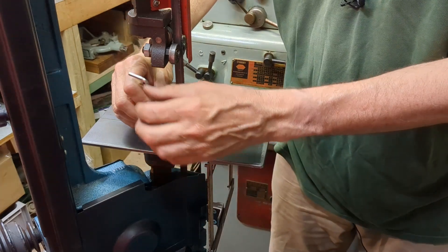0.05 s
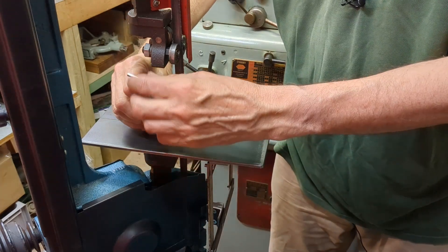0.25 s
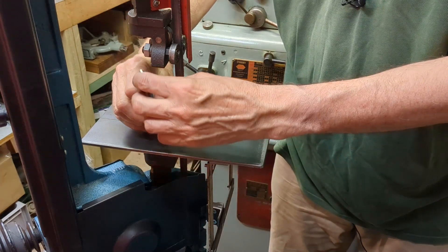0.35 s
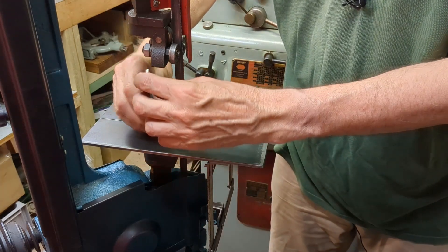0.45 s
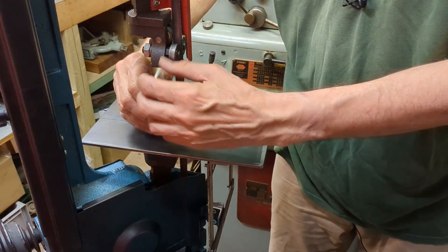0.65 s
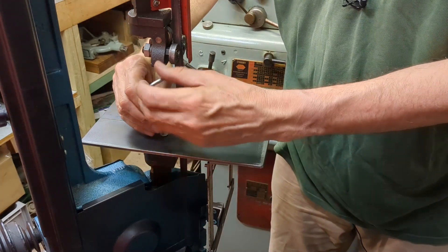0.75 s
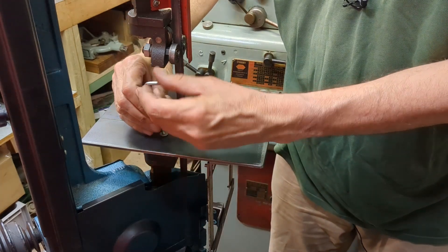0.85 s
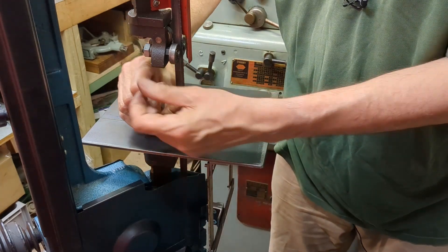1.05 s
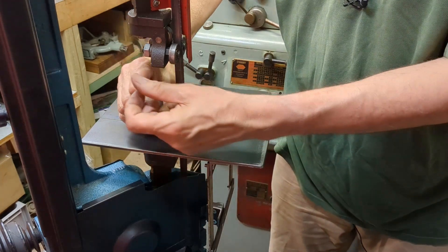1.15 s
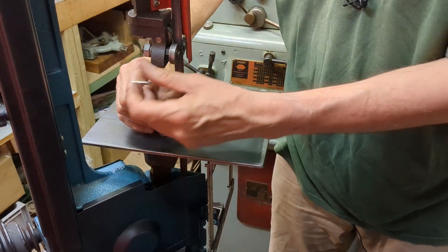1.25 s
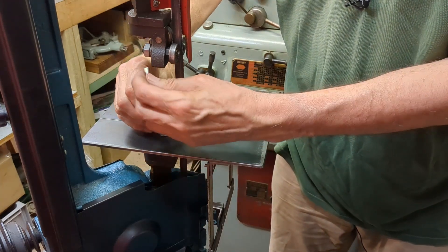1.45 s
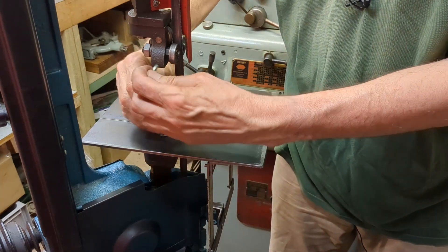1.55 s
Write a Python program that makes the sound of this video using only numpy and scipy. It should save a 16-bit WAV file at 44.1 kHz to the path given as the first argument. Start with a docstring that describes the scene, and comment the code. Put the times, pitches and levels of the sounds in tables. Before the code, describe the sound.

A thin steel rod clinks in a steel plate, close in a small workshop with short echo. Muted ticks and a brief scrape come around 0.2 s, with dull low knocks until 0.35 s. A deep rumble swells near 0.45 s and fades by 1 s; light ticks fall around 0.85 s. Two hard, bright clattering clinks hit at 1.23 and 1.27 s, then faint scrapes and ticks to 1.6 s.

```python
"""A thin steel rod is worked into a hole in the steel table of a machine, in a small workshop room.
Decaying sines make the two hard clinks of rod and plate; shaped noise adds the clatter of other parts.
Lighter ticks mix noise and muted ringing; the scrape along the rim is a run of random slips.
Dull low swings knock in the plate, and noise rumbles in the stand, swelling and sinking.
The rod reaches the microphone mostly direct, the rest with more of the room, over a faint hiss.
"""
import sys
import numpy as np
from scipy import signal
from scipy.fft import rfft, irfft
from scipy.io import wavfile

SR = 44100
rng = np.random.default_rng(int(sys.argv[2]) if len(sys.argv) > 2 else 0)


def put_to_file(sound):
    """Save the sound as 16-bit audio at rate SR, in the file named by the first command-line argument."""
    columns = np.atleast_2d(sound).T  # one column per channel
    safe = np.clip(columns, -1, 1)
    whole_steps = np.round(safe * 32767)
    wavfile.write(sys.argv[1], SR, whole_steps.astype(np.int16))


N = 70560  # samples, 1.6 s

# hard strikes of the rod: start_s, level_db, low_edge_hz, brightness_hz, rod_ring_db, plate_ring_db, clatter_db
CLINKS = [(1.2334, 1, 494, 6000, -5.5, 1.5, -2.5), (1.2691, 0.5, 190, 12170, 3.5, -9, 4)]
# ringing modes of the rod: pitch_hz, level_db, t60_s
ROD_MODES = [(1962, -34, .17), (1982, -42, .62), (2929, -32, .16), (4780, -40, .1), (5803, -33, .12),
             (3961, -34, .13), (4653, -44, .2), (6915, -56, .21)]
# ringing modes of the plate: pitch_hz, level_db, t60_s
PLATE_MODES = [(534, -38, .13), (581, -53.5, 0.38), (705, -47, .14), (783.5, -37.5, .14),
               (828.4, -25, 0.063), (890.2, -27, 0.11), (1118.6, -36.5, .08), (1140, -23.5, 0.055),
               (1302, -37, .12), (1510.6, -37, 0.12), (2377, -26.5, 0.037), (2576, -34, 0.077),
               (2616, -29.5, 0.09), (3690, -43, 0.055)]
# low modes of the machine's frame: pitch_hz, level_db, t60_s
FRAME_MODES = [(172, -57, .2), (238, -48, .22), (296, -48, .25), (352, -49, .3), (424, -51, .4)]
FRAME_RISE_S = 0.023
# colour of the dense clatter of the machine's other parts: frequency_hz, relative_level_db
CLATTER_COLOUR = [(100, -27.5), (250, -15.5), (420, -7.5), (560, -8.5), (850, 1), (1200, -2.5),
                  (1700, -6.5), (2500, -7.5), (3200, -9.5), (3800, -8), (4600, -11.5), (5150, -18),
                  (5750, -9.5), (6500, -26), (7300, -39)]
CLATTER_DB, CLATTER_HOLD_S, CLATTER_T60_S = -29.5, 0.008, 0.07
CONTACT_S = 0.00042  # time constant of the rise of a contact, about

# light catches of the rod on the rim: start_s, level_db, brightness_hz, rod_ring_db
TICKS = [(.083, -26.5, 1456, -3.5), (.1975, -15.5, 1100, 2.5), (0.208, -14, 1816, -1),
         (0.84, -21, 4200, -7), (.8836, -10.5, 3930, -0.5), (1.165, -29, 1340, 10.5),
         (1.403, -24, 2000, -3), (1.5262, -15.5, 2213, 7), (1.591, -17.5, 2780, -1)]
# colour of a light catch: frequency_hz, relative_level_db
TICK_COLOUR = [(200, -40.5), (450, -27.5), (600, -12), (840, 8.5), (1020, -11), (1200, 4.5), (1600, -11.5),
               (1850, -28.5), (2300, -30), (2650, -15), (3100, -60.5), (3650, -14), (3980, -11),
               (4400, -48), (7000, -46.5)]
TICK_DB, TICK_HOLD_S, TICK_T60_S, TICK_PLATE_DB = -32, 0.0088, 0.067, -5.5
TICK_MUTING = 0.57  # share of the tick's colour, in dB, that the ringing modes take on

# strokes of the rod along the rim: start_s, end_s, start_level_db, end_level_db, low_edge_hz, brightness_hz
STROKES = [(0, 0.17, -62.5, -60, 350, 2200), (.2, 0.345, -42.5, -76.5, 300, 1110),
           (0.505, 0.547, -72, -64.5, 650, 900), (.58, 0.637, -68.5, -75.5, 750, 938),
           (0.802, 0.843, -71.5, -52.5, 1100, 1720), (0.905, 1.012, -58, -84, 650, 1750),
           (1.042, 1.266, -73, -53.5, 600, 1770), (1.31, 1.468, -48, -68, 350, 1800),
           (1.541, 1.616, -55, -59.5, 450, 1750)]
# colour of the scrape: frequency_hz, relative_level_db
SCRAPE_COLOUR = [(200, -34), (420, -18), (560, -4), (720, -3.5), (860, 3), (1030, -19), (1250, -5),
                 (1480, -11.5), (1700, -37.5), (2400, -30.5), (7000, -57)]
SLIPS_PER_S, SLIP_SCATTER_DB, SCRAPE_RING_DB = 690, 4.5, -13
STROKE_ATTACK_S, STROKE_T60_S = 0.012, 0.084

# dull knocks of the shifting plate: start_s, pitch_hz, level_db, swell_s
KNOCKS = [(0.196, 35.9, -28.5, 0.011), (0.2172, 82.7, -16.5, 0.0058), (.250, 102, -18.5, 0.0037),
          (.277, 35.6, -24.5, 0.0063), (0.326, 66.3, -21.5, 0.006), (0.351, 64.5, -41, 0.0083),
          (0.605, 37.84, -34, .009), (0.721, 68.9, -45.5, 0.0054)]
KNOCK_OVERTONE, KNOCK_OVERTONE_DB = 2.06, -14.5  # pitch ratio, level
FRAME_KNOCK_DB = -0.5

# rumble of the stand over time: time_s, level_db
RUMBLE_LEVEL = [(0, -72), (.16, -59), (.23, -53), (.36, -48.5), (.45, -44.5), (.65, -46.5), (.87, -51),
                (1.0, -63), (1.15, -68.5), (1.6, -67.5)]
# colour of the rumble: frequency_hz, relative_level_db
RUMBLE_COLOUR = [(12, -3), (28, 6.5), (50, -7.5), (80, -16.5), (120, -31), (200, -43.5), (400, -65),
                 (900, -84)]

# decay of the room's echo: frequency_hz, t60_s
ROOM_T60 = [(150, 0.52), (400, 0.07), (1000, 0.3841), (2000, 0.33), (4000, 0.0326), (7000, 0.27)]
# colour of the room's echo: frequency_hz, relative_level_db
ROOM_COLOUR = [(60, -19.5), (170, -12.5), (330, 8), (600, 2), (900, -8), (2000, -3.5), (4000, 3),
               (7000, -7.5)]
ROOM_DB, ROOM_ONSET_S, ROD_ROOM_DB = -6.5, 0.008, -6.5

# colour of the recorder's hiss: frequency_hz, relative_level_db
HISS_COLOUR = [(20, 6.5), (80, 7.5), (180, 14.5), (300, -9.5), (1000, -11.5), (3000, -11.5), (8000, -18),
               (15000, -20.5)]
HISS_DB, TOP_HZ = -86.5, 7050


def undb(db):
    """Decibels to gain."""
    return 10 ** (np.asarray(db) / 20)


def unit(x):
    """Scale to an rms of 1."""
    return x / np.sqrt(np.mean(x ** 2) + 1e-30)


def curve(points):
    """Join (s, value) points by straight lines."""
    return np.interp(np.arange(N) / SR, *np.array(points).T)


def at(points, hz):
    """Read (Hz, value) points on a log-frequency axis."""
    point_hz, values = np.array(points, float).T
    return np.interp(np.log(hz + 1e-9), np.log(point_hz), values)


def freqs():
    """Frequencies of the padded spectrum, in Hz."""
    return np.arange(N + 1) * SR / (2 * N)


def shape(x, gain):
    """Filter by a gain per frequency."""
    return irfft(rfft(x, 2 * N) * gain)[:N]


def noise(colour):
    """Noise of a given colour, rms 1."""
    gain = undb(at(colour, freqs()))
    return unit(shape(rng.standard_normal(N), gain))


def age(start):
    """Seconds since a moment, zero before it."""
    return np.maximum(np.arange(N) / SR - start, 0)


def fade(t, t60):
    """Exponential decay, 60 dB in t60 seconds."""
    return np.exp(-np.log(1000) * t / t60)


def soften(x, hz, order=3, kind="low"):
    """A softer contact leaves out the treble (or, as a high-pass, a lighter one the bass)."""
    corner = min(hz, SR / np.e)  # stays below half the sample rate
    return signal.sosfilt(signal.butter(order, corner, kind, fs=SR, output="sos"), x + 1e-18)


def place(x, start):
    """Start a sound at a given time, with the short rise of a contact."""
    i = int(np.clip(start * SR, 0, N - 1))
    risen = x * (1 - fade(age(0), 7 * CONTACT_S))
    return np.concatenate([np.zeros(i), risen[:N - i]])


def ring(modes, t):
    """Decaying sines of a struck body; neighbouring modes swing in opposite senses."""
    out = 0
    for k, (hz, db, t60) in enumerate(modes):
        out = out + (-1) ** k * undb(db) * fade(t, t60) * np.sin(2 * np.pi * hz * t)
    return out


def clinks():
    """Hard strikes ring plate and frame and set the machine clattering; returns that and the ring of the rod."""
    t, out = age(0), np.zeros((2, N))
    plate, rod = ring(PLATE_MODES, t), ring(ROD_MODES, t)
    chatter = undb(CLATTER_DB) * fade(age(CLATTER_HOLD_S), CLATTER_T60_S)
    for start, db, low_hz, bright_hz, rod_db, plate_db, clatter_db in CLINKS:
        clatter = undb(clatter_db) * chatter * noise(CLATTER_COLOUR)
        body = undb(plate_db) * plate + frame(t) + clatter
        hit = np.array([place(body, start), undb(rod_db) * place(rod, start)])
        out += undb(db) * soften(soften(hit, bright_hz), low_hz, kind="high")
    return out


def ticks():
    """Light catches: a brief chatter in the plate's broad resonances, and a muted ring of plate and rod."""
    t, out = age(0), np.zeros(N)
    muting = undb(TICK_MUTING * at(TICK_COLOUR, freqs()))
    plate = undb(TICK_PLATE_DB) * shape(ring(PLATE_MODES, t), muting)
    rod = shape(ring(ROD_MODES, t), muting)
    chatter = undb(TICK_DB) * fade(age(TICK_HOLD_S), TICK_T60_S)
    for start, db, bright_hz, rod_db in TICKS:
        hit = plate + undb(rod_db) * rod + chatter * noise(TICK_COLOUR)
        out += undb(db) * soften(place(hit, start), bright_hz)
    return soften(out, hz=450, kind="high")


def scrape():
    """Each stroke is a run of tiny slips on the rim, coloured by the plate and ringing its modes."""
    slipping = rng.random(N) < SLIPS_PER_S / SR
    direction = rng.choice([-1, 1], N)
    scatter_db = SLIP_SCATTER_DB * np.clip(rng.standard_normal(N), -2, 2)
    slips = slipping * direction * undb(scatter_db)
    rub = unit(shape(slips, undb(at(SCRAPE_COLOUR, freqs()))))
    ringing = unit(signal.fftconvolve(slips, ring(PLATE_MODES, age(0)))[:N])
    rub = rub + undb(SCRAPE_RING_DB) * ringing
    out = np.zeros(N)
    for start, end, first_db, last_db, low_hz, bright_hz in STROKES:
        pressure = undb(np.interp(age(0), [start, end], [first_db, last_db]))
        touch = (1 - np.exp(-age(start) / STROKE_ATTACK_S)) * fade(age(end), STROKE_T60_S)
        grit = soften(soften(rub, bright_hz, order=6), low_hz, order=4, kind="high")
        out += pressure * touch * unit(grit)
    return out


def knocks():
    """The shifting plate makes heavily damped low swings with an overtone, which wake the frame."""
    out = np.zeros(N)
    for start, hz, db, swell in KNOCKS:
        t = age(start)
        rise, turn = t / (2 * swell), 2 * np.pi * hz * t
        push = (rise * np.exp(1 - rise)) ** 2  # peaks at 1, two swell times after the start
        overtone = undb(KNOCK_OVERTONE_DB) * push ** 2 * np.sin(KNOCK_OVERTONE * turn)
        swing = push * np.sin(turn) + overtone
        out += undb(db) * (swing + undb(FRAME_KNOCK_DB) * frame(t))
    return out


def frame(t):
    """The heavy frame takes a moment to start humming."""
    return ring(FRAME_MODES, t) * (1 - np.exp(-(t / FRAME_RISE_S) ** 2))


def rumble():
    """The stand rumbles: low noise whose level swells and sinks."""
    return noise(RUMBLE_COLOUR) * undb(curve(RUMBLE_LEVEL))


def room(x):
    """Diffuse echo of the workshop: noise in octave bands, each with its own decay."""
    t, grain, tail = age(0), rng.standard_normal(N), 0
    colour = undb(at(ROOM_COLOUR, freqs()))
    for hz in 62.5 * 2. ** np.arange(9):
        band = np.maximum(1 - np.abs(np.log2((freqs() + 1e-9) / hz)), 0)  # overlapping triangles
        decay = fade(t, at(ROOM_T60, hz)) * (1 - np.exp(-(t / ROOM_ONSET_S) ** 2))
        tail = tail + shape(grain, band * colour) * decay / np.linalg.norm(decay)
    return undb(ROOM_DB) * signal.fftconvolve(x, tail)[:N]


def scene():
    """Rod and plate in the room; the thin rod is heard mostly direct."""
    struck, rod = clinks()
    machine = struck + ticks() + scrape() + knocks() + rumble()
    echo = room(machine + undb(ROD_ROOM_DB) * rod)
    return (machine + rod + echo)[None]


def record(dry):
    """The recorder cuts the treble steeply, lets a little of it through and adds a faint hiss."""
    cut = signal.sosfilt(signal.ellip(8, .3, 60, TOP_HZ, fs=SR, output="sos"), dry)
    leak = undb(-24) * soften(dry, TOP_HZ, order=2, kind="high")
    hissy = cut + leak + undb(HISS_DB) * noise(HISS_COLOUR)
    return signal.sosfilt(signal.ellip(8, .2, 70, 15500, fs=SR, output="sos"), hissy)


dry = scene()
out = record(dry)
put_to_file(out)
```